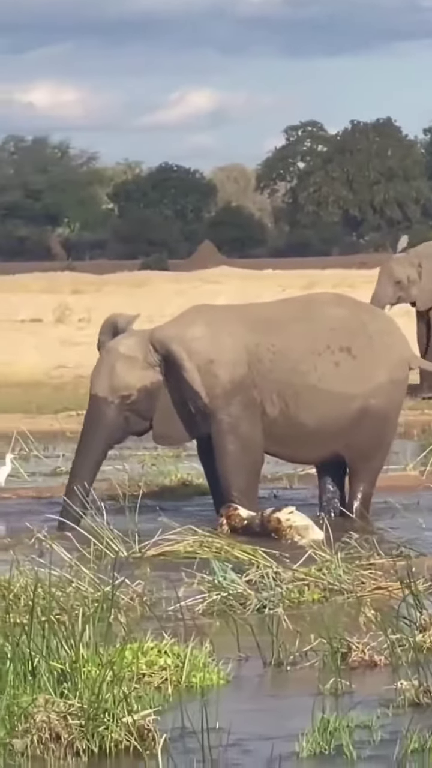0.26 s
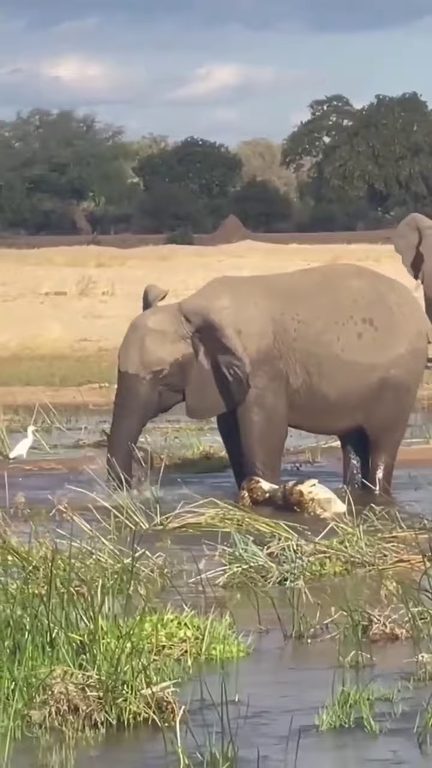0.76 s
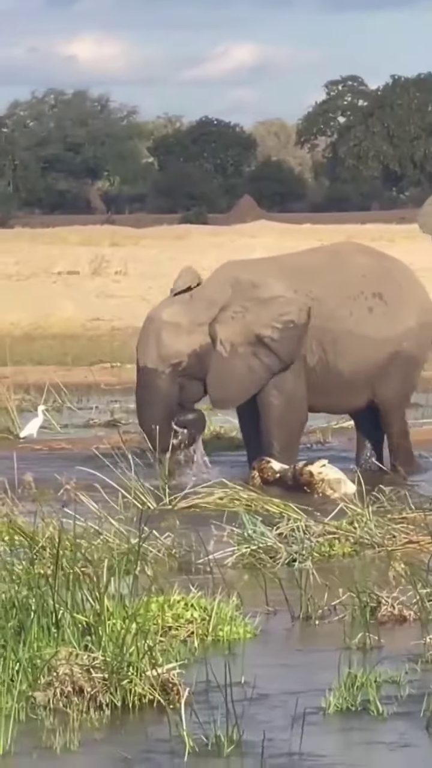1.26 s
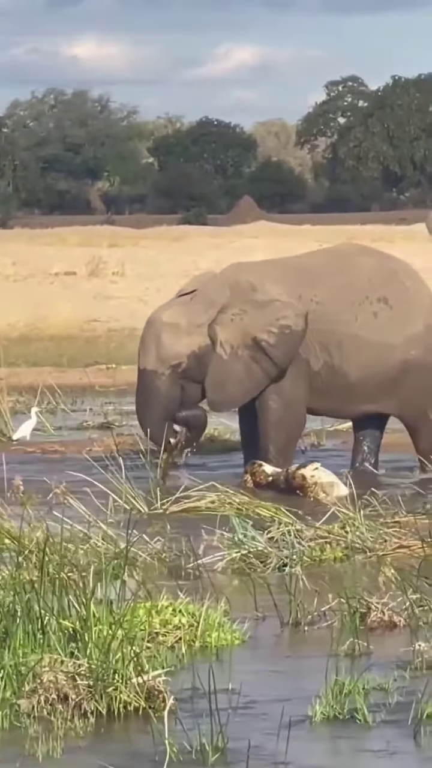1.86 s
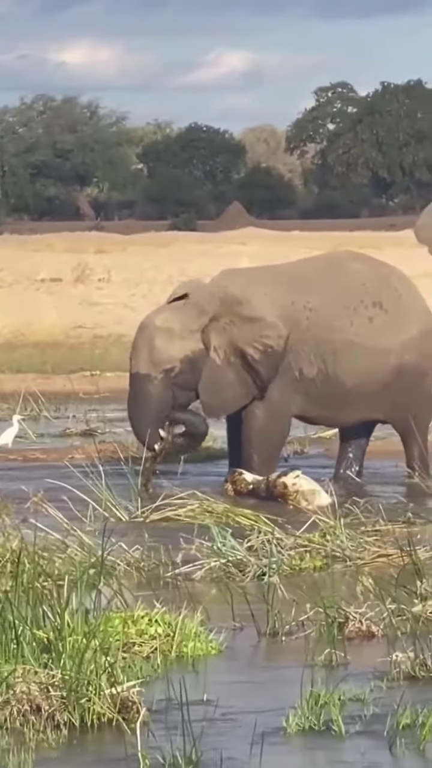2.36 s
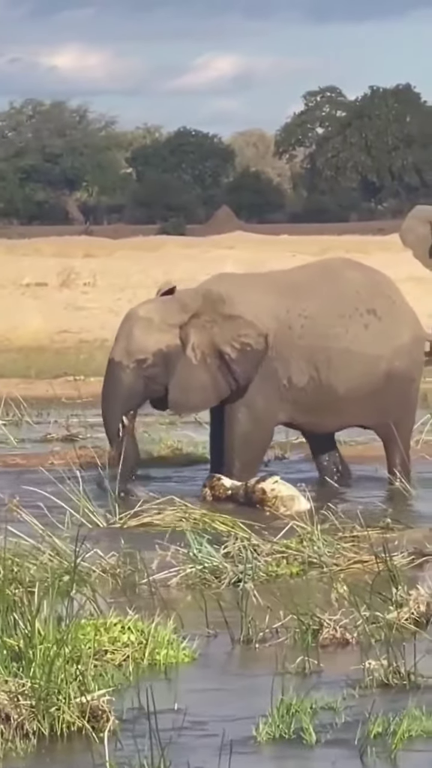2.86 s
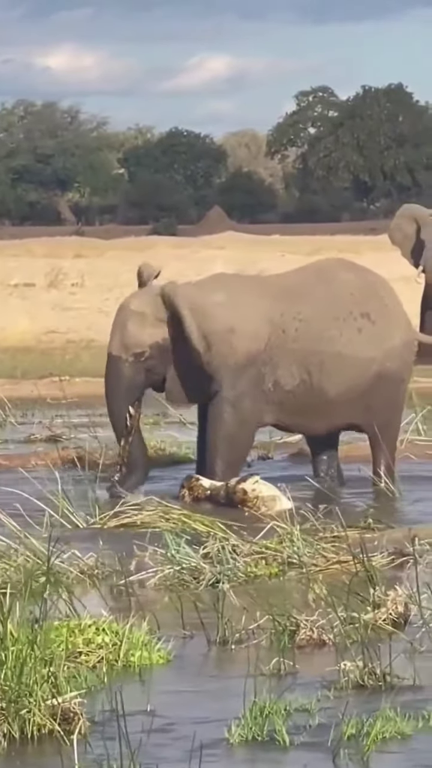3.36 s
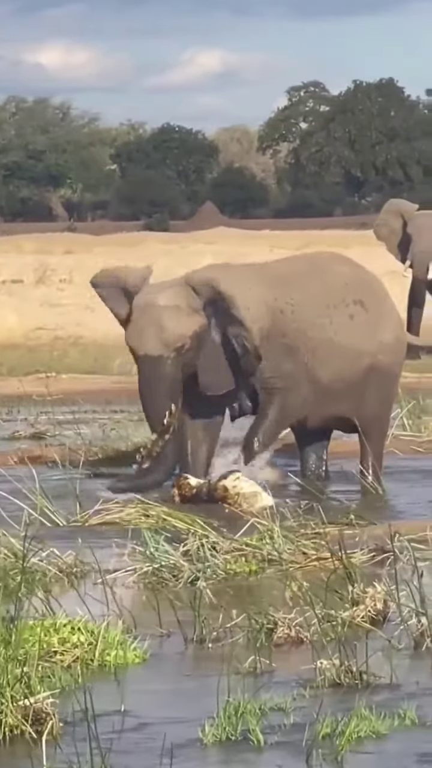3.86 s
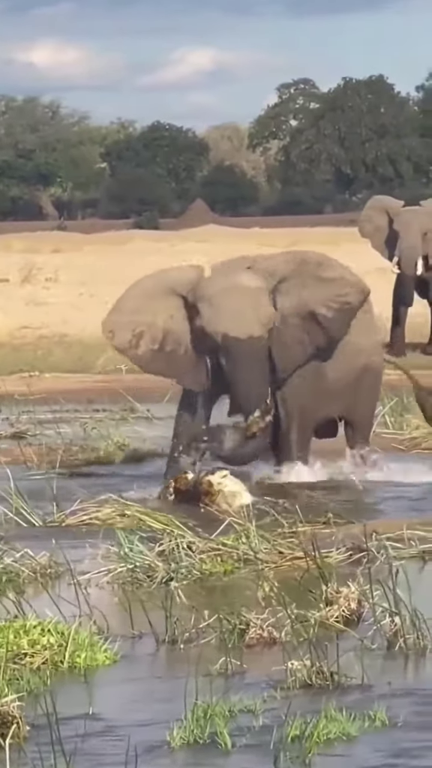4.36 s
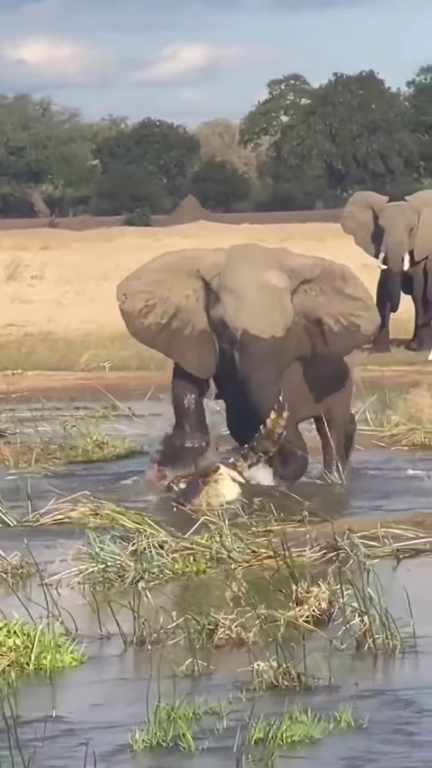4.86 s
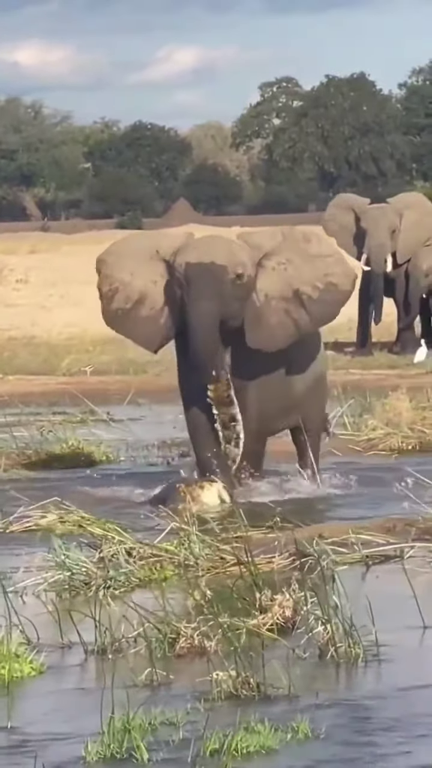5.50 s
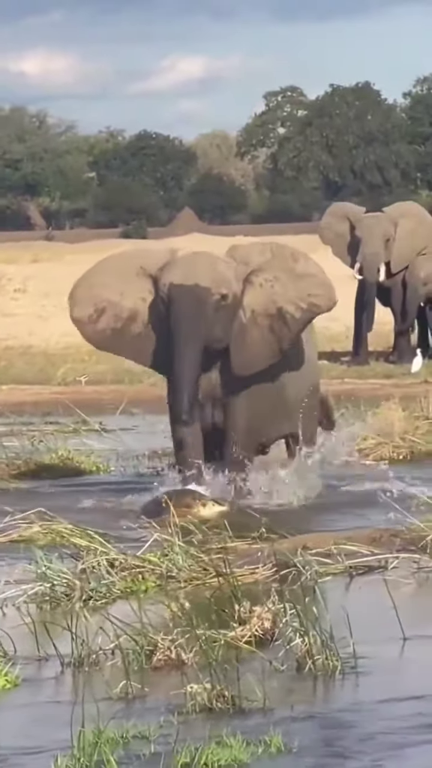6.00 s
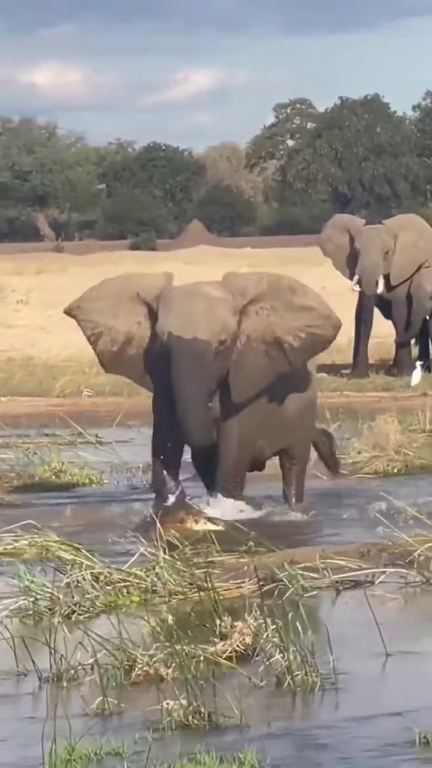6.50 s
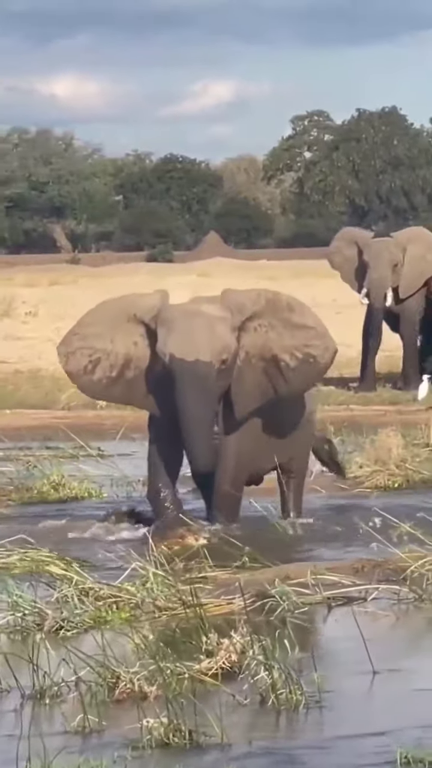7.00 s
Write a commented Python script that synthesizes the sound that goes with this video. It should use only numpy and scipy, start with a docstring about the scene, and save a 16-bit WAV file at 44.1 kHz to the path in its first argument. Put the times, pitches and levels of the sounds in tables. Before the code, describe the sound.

Outdoors at a shallow river, wind rumbles and puffs strongly on a handheld microphone over a low drone and faint river wash. Some way off, an elephant's trunk sloshes and gurgles softly, with small drops and ticks. A hard dull thump jolts the microphone just before four seconds, then the animal stamps and thrashes: bubbling plunges, wet slaps and spray raining back until the end.

```python
"""An elephant in a shallow river, some way off, over a steady low background and the faint wash of the river.
At first its trunk sloshes and gurgles: each splash is a dull slosh, a wash of bubbles and a spray that rains back.
Wind buffets the microphone in puffs and gusts and keeps up a hollow rumble that swells into clean notes.
A few drops, ticks and rustles stand out; one hard thump falls just before 4 s.
Then the animal stamps and thrashes: legs plunge in with clouds of bubbles, among harder slaps and splashes."""
import sys
import numpy as np
from scipy import signal
from scipy.io import wavfile

SR = 44100
rng = np.random.default_rng(int(sys.argv[2]) if len(sys.argv) > 2 else 0)


def persist_wave(psi):
    """Save psi, clipped to +-1, as 16-bit WAV."""
    counts = np.round(np.clip(psi, -1, 1) * 32767).astype(np.int16)
    wavfile.write(sys.argv[1], SR, np.atleast_2d(counts).T)


N = 319328
TIME = np.arange(N) / SR

# colour of the thrown water as it patters back: f/Hz, density/dB per Hz
SPRAY_SPECTRUM = [(1700, 7.5), (2200, 4.5), (3300, 6), (4200, 1), (5600, 2.5), (6500, -9.5), (8200, -11),
                  (10000, -41)]
# strength of the breeze, as the level of the hollow rumble it keeps up: t/s, level/dB
BREEZE_CURVE = [(0, -35.5), (.12, -35), (.4, -34.5), (.9, -33), (1.6, -30), (2.3, -24.5), (2.4, -34.5),
                (2.9, -29.5), (3.7, -28.5), (4.15, -40.5), (4.9, -42), (5.3, -30), (5.57, -34),
                (5.68, -26.5), (6.0, -33.5), (6.7, -35), (7.24, -36.5)]


def from_db(db):
    """Decibels to gain."""
    return 10 ** (np.asarray(db) / 20)


def rms_one(x):
    """Scale to unit rms."""
    return x / np.sqrt(np.mean(x ** 2) + 1e-20)


def in_time(rows):
    """Each column of a curve table, at every sample."""
    s, *columns = np.transpose(rows)
    return [np.interp(TIME, s, column) for column in columns]


def at_hz(points, hz):
    """Read a spectrum on a log-frequency axis."""
    point_hz, point_db = np.transpose(points)
    return np.interp(np.log(hz), np.log(point_hz), point_db)


def drift(rate):
    """Slow chance with about this many turns a second; spread 1."""
    step = 40  # samples between slow values
    r = np.exp(-2 * np.pi * rate * step / SR)
    white = rng.standard_normal(N // step + 2002)
    slow = signal.lfilter([1], [1, -2 * r, r * r], white)[2000:]  # let the filter settle first
    return np.interp(np.arange(N) / step, np.arange(len(slow)), rms_one(slow))


def resonate(x, hz, width_hz):
    """A resonance with gain 1 at its top."""
    r = np.exp(-np.pi * width_hz / SR)
    feedforward = np.array([1, 0, -1]) * (1 - r * r) / 2
    feedback = [1, -2 * r * np.cos(2 * np.pi * hz / SR), r * r]
    return signal.lfilter(feedforward, feedback, x + 1e-18)


def band(x, hz, width_hz):
    """A resonance passed twice: steep skirts."""
    return resonate(resonate(x, hz, width_hz), hz, width_hz)


def low_pass(x, hz):
    """Steep cut above hz."""
    return signal.sosfilt(signal.butter(8, hz, fs=SR, output="sos"), x)


def add(out, s, sound):
    """Mix a short sound in at time s."""
    start = max(0, round(s * SR))
    out[start:start + len(sound)] += sound[:max(0, N - start)]


def swell(s, length_s, attack_s, release_s):
    """Rise, hold until the length is over, then fall 60 dB in the release time."""
    t = TIME - s
    rise = np.clip(t / attack_s, 0, 1)
    return rise * np.exp(-np.log(1000) * np.clip((t - length_s) / release_s, 0, 2))


def swells_db(rows, rise_share, release_s, rest_db):
    """Level in dB of overlapping swells (s, length s, dB) added to a resting level; longer ones build more slowly."""
    power = from_db(rest_db) ** 2
    for s, length_s, db in rows:
        power = power + (from_db(db) * swell(s, length_s, rise_share * length_s, release_s)) ** 2
    return 10 * np.log10(power)


def turbulence(spectrum, patchy_db, patch_rate):
    """Third-octave bands of noise that flicker partly together, partly alone; rms 1."""
    edges = 2 ** np.arange(np.log2(spectrum[0][0]), np.log2(spectrum[-1][0]), 1 / 3)
    white, together, out = rng.standard_normal((2, N)), drift(patch_rate), 0
    for k, low in enumerate(edges):
        high = min(low * 2 ** (1 / 3), .45 * SR)
        # neighbouring bands draw on different noises
        noise = signal.sosfilt(signal.butter(2, [low, high], "band", fs=SR, output="sos"), white[k % 2])
        flicker_db = patchy_db * (together + drift(patch_rate)) / np.sqrt(2)
        out = out + noise * from_db(at_hz(spectrum, np.sqrt(low * high)) + flicker_db)
    return rms_one(out)


def bubbles(spectrum, per_s, cycles, spread_db, clump_db, count=16):
    """Bubbles of random size, each ringing for some cycles; those of one pitch come in clumps; rms 1."""
    sizes = from_db(spread_db * np.minimum(rng.exponential(1, N), 4)) * rng.choice([-1, 1], N)
    clicks = sizes * (rng.random(N) < per_s / SR)
    dealt, out = rng.integers(0, count, N), 0  # each click goes to one of count pitches
    for k, hz in enumerate(np.geomspace(spectrum[0][0], spectrum[-1][0], count)):
        clumped = clicks * (dealt == k) * from_db(clump_db * drift(33.0))
        ringing = rms_one(band(clumped, hz, 2 * hz / cycles))
        # sqrt(hz): pitches lie wider apart as they rise, and the spectrum is per Hz
        out = out + ringing * np.sqrt(hz) * from_db(at_hz(spectrum, hz))
    return rms_one(out)


def background():
    """A dull steady drone of low noise, and the faint wash of the river farther off."""
    # colours of the drone and the far river: f/Hz, density/dB per Hz
    drone_spectrum = [(25, -29.5), (55, -10), (105, 5), (170, -11.5), (300, -15), (390, -20.5), (490, -9.5),
                      (620, -33)]
    far_spectrum = [(700, -3), (950, 4.5), (1150, -11), (1500, 6.5), (1900, -3.5), (2300, -5.5),
                    (4000, -22.5), (5600, -4.5), (7000, -43), (12000, -46.5)]
    drone = low_pass(turbulence(drone_spectrum, patchy_db=1.5, patch_rate=13.0), hz=540)
    far_river = turbulence(far_spectrum, patchy_db=3.5, patch_rate=64)
    return from_db(-32.0) * drone + from_db(-54.5) * far_river


def water_levels():
    """Levels of wash, spray and mist: in each throw the wash builds a little faster, the spray and mist fade sooner."""
    # trunk and feet throw water, levels ahead of each layer's trim:
    # t/s, length/s, bubble wash level/dB, spray level/dB, fine mist level/dB
    throws = [(0.332, 0.68, -55, -62, -80.5), (0.591, 0.41, -48, -54, -74), (0.982, 0.45, -46.5, -54, -74),
              (1.218, 0.65, -49, -55, -67.5), (1.878, 0.23, -48, -57, -80), (3.186, 0.21, -48, -67, -101),
              (3.316, 0.36, -48.5, -59.5, -94), (3.61, 0.57, -45.5, -58, -86),
              (3.995, 0.19, -40.5, -56, -74), (4.175, 0.052, -44, -55.5, -71), (4.283, 0.42, -41, -48, -65),
              (4.629, 0.032, -40, -64, -71), (4.729, 0.37, -47, -55, -71.5), (4.878, 0.11, -41, -56.5, -75),
              (5.141, 0.19, -41, -54.5, -68), (5.288, 0.086, -38.5, -46, -61),
              (5.346, 0.44, -43.5, -48.5, -62.5), (5.797, 0.2, -40.5, -53, -68.5),
              (5.937, 0.069, -38, -48, -65), (6.077, 0.21, -43, -55, -72), (6.154, 0.6, -40.5, -48.5, -65),
              (6.849, 0.2, -44.5, -55, -72), (7.14, 0.064, -47, -63, -81)]
    s, length_s, wash_db, spray_db, mist_db = np.transpose(throws)
    # a splash builds for a share of its length, then dies away to quiet lapping
    wash_shape = dict(rise_share=0.22, release_s=0.99)
    spray_shape = dict(rise_share=0.29, release_s=0.83)
    return (swells_db(zip(s, length_s, wash_db), **wash_shape, rest_db=-50.5),
            swells_db(zip(s, length_s, spray_db), **spray_shape, rest_db=-63.5),
            swells_db(zip(s, length_s, mist_db), **spray_shape, rest_db=-81))


def splashing(wash_db, spray_db, mist_db, hard_db=-44, churn_growth=4.6):
    """Big pockets of air slosh, small bubbles wash, and thrown water patters back as spray and mist."""
    # colours of slosh, wash, churn and mist: f/Hz, density/dB per Hz
    slosh_spectrum = [(380, -16), (440, -13.5), (520, -4), (590, -4), (650, -11)]
    wash_spectrum = [(1100, -6.5), (1400, 4), (1600, 0), (1950, -24)]
    churn_spectrum = [(600, 9), (700, -1.5), (820, -3), (1000, -8.5), (1200, -1.5)]
    mist_spectrum = [(5000, -2), (5700, -3), (7500, 4.5), (9800, 6), (11200, 7.5), (11900, 3.5),
                     (12500, -15.5)]
    # the slosh has its own mean level and takes a share of the wash's swing
    slosh_db = -44.5 + 0.71 * (wash_db - wash_db.mean())
    pockets = bubbles(slosh_spectrum, per_s=600, cycles=22.3, spread_db=2.5, clump_db=4.5, count=24)
    slosh = from_db(slosh_db - 5.0) * pockets
    small = bubbles(wash_spectrum, per_s=900, cycles=43, spread_db=1.0, clump_db=1.0)
    wash = from_db(wash_db - 10.5) * small
    # only hard splashes drive enough air under to make the larger churning bubbles
    churn_db = wash_db + churn_growth * np.minimum(wash_db - hard_db, 0)
    larger = bubbles(churn_spectrum, per_s=690, cycles=19.7, spread_db=4.0, clump_db=3.0, count=14)
    churn = from_db(churn_db - 7.5) * larger
    patter = bubbles(SPRAY_SPECTRUM, per_s=2400, cycles=32, spread_db=1.6, clump_db=2.0, count=44)
    hiss = turbulence(SPRAY_SPECTRUM, patchy_db=1.5, patch_rate=7.5)
    spray = from_db(spray_db) * (from_db(-4.5) * patter + from_db(-2.0) * hiss)
    fine = bubbles(mist_spectrum, per_s=6900, cycles=65, spread_db=1.5, clump_db=2.5, count=56)
    mist = from_db(mist_db + 4.5) * fine
    return low_pass(slosh, hz=635) + churn + wash + spray + mist


def dollops(per_s=45, fade_s=.012, share=.18):
    """Thrown water lands in dollops: a share of the sound comes in sudden swells that fade; rms 1."""
    landings = (rng.random(N) < per_s / SR) * rng.uniform(.5, 1, N)
    power = signal.lfilter([1], [1, -np.exp(-1 / (fade_s * SR))], landings + 1e-18)
    return np.sqrt(1 - share + share * power / power.mean())


def plops(wash_db, level_db=-13, hard_db=-44):
    """Lone large bubbles stand out of the hard splashes with a clear, longer ring."""
    # colour of the plops: f/Hz, density/dB per Hz
    plop_spectrum = [(650, 2), (1300, 3.5), (1700, -14.5), (2300, -10.5), (3400, -18), (4300, -23)]
    lone = bubbles(plop_spectrum, per_s=260, cycles=30, spread_db=2.0, clump_db=1.5, count=36)
    return from_db(wash_db + level_db + .5 * np.minimum(wash_db - hard_db, 0)) * lone


def spatter(spray_db, level_db=-12, hard_db=-48, growth=0.3):
    """Heavy drops of a hard splash crack on the water one by one, each a short ring."""
    cracks = bubbles(SPRAY_SPECTRUM[:-2], per_s=160, cycles=12.0, spread_db=1.2, clump_db=0.0, count=12)
    return from_db(spray_db + level_db + growth * np.minimum(spray_db - hard_db, 0)) * cracks


def gurgles(churn_rate=90, level_db=-0.5, wander=.06, firm=.4):
    """A falling stream keeps a pocket of air ringing unevenly; its pitch moves as its size changes."""
    # water runs off the trunk and churns pockets of air: t/s, length/s, level/dB ahead of the trim, f/Hz
    streams = [(0, 0.082, -42.5, 486.4), (0.547, 0.036, -39.5, 480), (0.89, 0.2, -51.5, 880),
               (1.266, 0.52, -41, 488), (1.325, 0.055, -46, 713), (1.414, 0.21, -50, 904),
               (1.594, 0.16, -40.5, 540), (1.804, 0.22, -39.5, 497), (1.766, 0.081, -49.5, 859),
               (3.285, 0.45, -51, 639), (3.349, 0.14, -42, 520)]
    out = 0
    for s, length_s, db, hz in streams:
        phase = 2 * np.pi * np.cumsum(hz * (1 + wander * drift(6))) / SR
        steady_part = (firm + drift(churn_rate)) * np.sin(phase)
        pocket = rms_one(steady_part + drift(churn_rate) * np.cos(phase))
        envelope = swell(s, length_s, attack_s=0.0087, release_s=0.15)
        out = out + from_db(db + level_db) * envelope * pocket
    return out


def rumble(wander=0.0539, flutter_db=3.0, width_hz=60, breathy_db=-7, surge_db=1, early_release_s=0.03005):
    """Wind sets a hollow ringing: a low tone that wavers in rough air and holds clean in a surge."""
    # the rumble catches and swells into a clean note:
    # t/s, length/s ahead of the early release, level/dB ahead of the surge trim, f/Hz
    clean_notes = [(1.232, 0.077, -24, 106), (1.416, 0.047, -15, 113), (1.539, 0.098, -19.5, 115),
                   (1.633, 0.077, -23.5, 106), (1.775, 0.064, -17.5, 105.6), (1.849, 0.059, -16, 100.4),
                   (1.935, 0.075, -17, 103.5), (2.012, 0.05, -12, 110.6), (2.077, 0.047, -14, 96.4),
                   (2.168, 0.059, -13, 105), (2.295, 0.048, -9, 104.2), (2.451, 0.089, -17.5, 113.2),
                   (2.58, 0.088, -19.5, 104.5), (2.781, 0.09, -21.5, 101), (2.864, 0.066, -19.5, 100.7),
                   (2.991, 0.057, -20, 101.7), (3.083, 0.058, -22, 96.6), (3.323, 0.077, -26, 95.7),
                   (3.404, 0.12, -21.5, 127.4), (3.565, 0.07, -20.5, 109.5), (3.731, 0.042, -25.5, 108.4),
                   (3.803, 0.027, -24, 104.3), (4.739, 0.12, -23, 102.6), (4.821, 0.17, -20.5, 100.8),
                   (4.977, 0.14, -23, 102.1), (5.085, 0.13, -19.5, 102.4), (5.261, 0.053, -20, 113.7),
                   (5.498, 0.045, -12.5, 106.4), (5.609, 0.09, -23, 118)]
    rest_hz, attack_s, release_s = 108.04, 0.022, 0.068
    breeze_db, = in_time(BREEZE_CURVE)
    rough = from_db(breeze_db) ** 2
    power, pull = rough, rough * rest_hz
    for s, length_s, db, note_hz in clean_notes:
        envelope = swell(s, length_s - early_release_s, attack_s, release_s)
        surge = (from_db(db + surge_db) * envelope) ** 2
        power, pull = power + surge, pull + surge * note_hz
    # the stronger of breeze and surge rules the pitch
    hz, unsteady = pull / power, rough / power
    phase = 2 * np.pi * np.cumsum(hz * (1 + wander * unsteady * drift(14.3))) / SR
    tone = np.sqrt(2) * np.sin(phase) * from_db(flutter_db * unsteady * drift(41))
    air = unsteady * from_db(breathy_db) * rms_one(band(rng.standard_normal(N), 142.7, width_hz))
    return np.sqrt(power) * (tone + air)


def wind():
    """Large eddies sway the diaphragm, small ones buffet it in lumps; a gust may raise either or both."""
    # gusts on the microphone, levels ahead of the trims: t/s, length/s, buffeting level/dB, deep sway level/dB
    gusts = [(0.49, 0.28, -23.5, -34), (0.844, 0.084, -30, -29), (1.441, 0.046, -22.5, -42),
             (1.85, 0.25, -39, -28.5), (2.64, 0.052, -40.5, -24.5), (3.054, 0.072, -28.5, -22.5),
             (3.246, 0.17, -26, -46), (3.361, 0.37, -30.5, -30), (3.534, 0.053, -28, -27),
             (3.796, 0.11, -20.5, -29), (3.989, 0.028, -21.5, -18.5), (4.199, 0.087, -29, -26),
             (4.454, 0.059, -29.5, -45), (4.895, 0.19, -51, -31), (5.131, 0.071, -26.5, -19),
             (5.285, 0.049, -21, -39), (5.558, 0.076, -26, -45), (5.833, 0.44, -26, -34),
             (6.385, 0.17, -27, -28.5), (6.886, 0.32, -25, -39)]
    # colours of the sway and the buffeting: f/Hz, density/dB per Hz
    sway_spectrum = [(22, -27.5), (35, -4.5), (58, -6), (75, 2), (110, -12)]
    buffet_spectrum = [(110, 5), (145, 4), (230, 0), (310, -5.5), (400, -23), (550, -33), (750, -37.5)]
    shape = dict(rise_share=0.19, release_s=0.26)
    # between the gusts, buffeting takes a share of the breeze's swing and the sway rests
    breeze_db, = in_time(BREEZE_CURVE)
    mean_db = breeze_db.mean()
    calm_db = mean_db + 0.55 * (breeze_db - mean_db) - 0.5
    buffet_db = swells_db([(s, length, db) for s, length, db, _ in gusts], **shape, rest_db=calm_db)
    sway_db = swells_db([(s, length, db) for s, length, _, db in gusts], **shape, rest_db=-36.5)
    sway = from_db(sway_db - 4.5) * turbulence(sway_spectrum, patchy_db=0.5, patch_rate=18)
    buffet = from_db(buffet_db - 4.5) * turbulence(buffet_spectrum, patchy_db=3.0, patch_rate=20.5)
    return low_pass(sway + buffet, hz=589)


def rustles():
    """Dry stems slide over each other in short, scratchy strokes of thin noise."""
    # stems brush past close by: t/s, length/s, level/dB
    brushes = [(-0.002, 0.03, -64), (0.18, 0.04, -65), (0.503, 0.045, -71), (2.487, 0.056, -67),
               (3.711, 0.057, -71.5), (3.895, 0.044, -73), (4.082, 0.031, -59.5), (4.19, 0.033, -59.5),
               (7.023, 0.037, -72)]
    # colour of the stems: f/Hz, density/dB per Hz
    stem_spectrum = [(7000, -13), (9500, -1), (10800, -3), (11600, -6), (12500, -18)]
    strokes = sum(from_db(db) * swell(s, length_s, attack_s=.01, release_s=.16) for s, length_s, db in brushes)
    return strokes * turbulence(stem_spectrum, patchy_db=4.0, patch_rate=120)


def slaps(level_db=-3, smack_db=2, smack_cycles=2.5, burst_db=-2):
    """A flat blow on the water: a short smack on contact, then a broad burst that dies quickly."""
    # slaps of feet and trunk on the water: t/s, level/dB ahead of the trims, f/Hz, ring (60 dB fall)/s
    blows = [(0.287, -46, 1300, 0.1), (1.159, -36, 1730, 0.032), (1.891, -35.5, 1410, 0.042),
             (2.325, -45, 1910, 0.021), (2.588, -39, 1530, 0.032), (3.269, -41, 520, 0.045),
             (3.3, -39, 1140, 0.026), (3.326, -44, 3030, 0.038), (3.371, -40, 1900, 0.044),
             (3.444, -39, 1012, 0.025), (4.029, -40.5, 2000, 0.042), (4.183, -46, 1184, 0.09),
             (4.217, -39.5, 2100, .06), (4.358, -30.5, 1010, 0.034), (4.571, -41, 1587, 0.051),
             (4.646, -40, 2290, 0.16), (4.899, -40, 1300, 0.038), (4.941, -37, 650.5, 0.04),
             (5.313, -40, 1110, 0.045), (5.332, -36, 1216, .05), (5.349, -24.5, 1080, 0.046),
             (5.35, -29, 3220, 0.037), (5.381, -31.5, 1198, 0.045), (5.438, -33, 1398, 0.042),
             (5.651, -34, 1070, 0.12), (5.714, -35, 1264, 0.087), (5.747, -34, 1240, 0.036),
             (5.778, -33.5, 1300, 0.04), (5.835, -31, 600, 0.032), (5.948, -42, 2130, 0.059),
             (5.979, -36, 1408, 0.099), (6.136, -58, 1090, 0.13), (6.288, -34, 1110, 0.084),
             (6.549, -36, 1110, 0.08), (6.674, -43, 2010, 0.08), (6.727, -40, 1225, 0.039)]
    out, t = np.zeros(N), TIME[:SR // 5]
    for s, peak_db, hz, ring_s in blows:
        smack = np.sin(2 * np.pi * hz * t) * from_db(smack_db) * np.exp(-hz * t / smack_cycles)
        noise = rms_one(band(rng.standard_normal(len(t)), hz, .8 * hz))
        burst = noise * from_db(burst_db - 60 * t / ring_s)
        add(out, s, from_db(peak_db + level_db) * (smack + burst))
    return out


def puffs(rise_s=0.0043, level_db=-3, ragged_db=-10):
    """An eddy strikes the port: a short low whump with a ragged body."""
    # single puffs of wind: t/s, level/dB ahead of the trim, f/Hz
    eddies = [(0.616, -16.5, 240), (0.737, -16, 221), (0.884, -23, 326), (1.156, -18.5, 276),
              (1.309, -22.5, 272), (1.478, -18, 260), (1.497, -17.5, 254), (1.959, -23, 255),
              (2.183, -28, 238), (2.324, -16, 237), (2.456, -24, 330), (3.093, -19, 229),
              (3.128, -29, 241.5), (3.326, -21.5, 238), (3.905, -23, 256), (4.011, -41, 189),
              (4.505, -19.5, 253.4), (5.319, -17, 239.6), (5.919, -17.5, 213), (6.069, -20, 240),
              (6.114, -16.5, 246), (6.158, -23, 194.5), (6.241, -16.5, 198), (6.414, -18, 228),
              (7.123, -15.5, 264.4), (7.174, -17, 326)]
    out, t = np.zeros(N), TIME[:SR // 10]
    envelope = t / rise_s * np.exp(1 - t / rise_s)
    for s, peak_db, hz in eddies:
        whump = np.sin(2 * np.pi * hz * t)
        ragged = rms_one(band(rng.standard_normal(len(t)), hz, hz))
        add(out, s, from_db(peak_db + level_db) * envelope * (whump + from_db(ragged_db) * ragged))
    return low_pass(out, hz=520)


def drops(rise=0.44, splat_db=-12, level_db=-2):
    """A drop splats and leaves a bubble whose pitch climbs as it dies."""
    # single drops and large bubbles: t/s, level/dB ahead of the trim, starting f/Hz, ring (60 dB fall)/s
    lone_drops = [(0.905, -39, 1650, 0.022), (1.1, -52, 3000, .048), (1.404, -26.5, 714, 0.046),
                  (1.456, -35, 855, .05), (1.691, -46, 3330, .048), (1.783, -47, 720, 0.047),
                  (2.085, -39.5, 1060, 0.052), (2.188, -35, 566, 0.072), (2.973, -42, 3360, 0.024),
                  (3.068, -50, 3270, 0.036), (3.205, -38, 2450, 0.039), (3.371, -23, 565, 0.053),
                  (3.444, -30, 587, .06), (3.741, -40.5, 3370, 0.022), (3.851, -41, 1523, 0.071),
                  (4.594, -29, 955, 0.035), (4.695, -36, 1120, 0.035), (6.14, -29.5, 934, 0.059),
                  (6.297, -22.5, 602, 0.043), (6.564, -32, 910, 0.041), (6.758, -39, 652, .05),
                  (6.801, -34, 854, 0.04), (6.949, -37, 1135, 0.046), (6.975, -28, 590, 0.068),
                  (7.02, -36, 810, .05), (7.1, -40, 1400, 0.037)]
    out, t = np.zeros(N), TIME[:SR // 10]
    for s, peak_db, hz, ring_s in lone_drops:
        bubble = np.sin(2 * np.pi * hz * t * (1 + rise * t))
        splat = from_db(splat_db) * rms_one(band(rng.standard_normal(len(t)), hz, hz / 2))
        opening = 1 - np.exp(-hz * t)
        add(out, s, opening * from_db(peak_db + level_db - 60 * t / ring_s) * (bubble + splat))
    return out


def ticks(level_db=-3, snap_hz=5900, snap_width_hz=6000, rise_s=0.00044):
    """Brief bright ticks near the microphone: a dry noise snap mixed with a clear ring."""
    # small sharp ticks: t/s, level/dB ahead of the trim, ring (60 dB fall)/s, share of clear ring/0-1
    close_ticks = [(2.326, -40, 0.016, 0.5), (2.785, -50, 0.036, 0.34), (2.991, -42, 0.054, 0.46),
                   (2.998, -45, 0.025, 0.4), (3.008, -48, 0.045, 0.35), (3.999, -46, 0.033, 0.52),
                   (5.3, -37, 0.024, 0.29), (5.352, -46, 0.018, 0.23), (5.6422, -14, 0.006, 0.9),
                   (6.005, -43, 0.032, 0.18)]
    # what a tick rings with: f/Hz, relative level/dB
    ring_modes = [(5300, 7), (5600, 13), (5950, -13.5), (7300, -15), (9900, -18), (11000, -1.5),
                  (12300, -5)]
    out, t = np.zeros(N), TIME[:SR // 10]
    ring = rms_one(sum(from_db(db) * np.sin(2 * np.pi * hz * t) for hz, db in ring_modes))
    for s, peak_db, ring_s, clear in close_ticks:
        snap = rms_one(band(rng.standard_normal(len(t)), snap_hz, snap_width_hz))
        envelope = (1 - np.exp(-t / rise_s)) * from_db(peak_db + level_db - 60 * t / ring_s)
        add(out, s, envelope * (clear * ring + (1 - clear) * snap))
    return out


def thump(dull_hz=1050, rise_s=0.00022, level_db=1.5):
    """Heavily damped shoves in quick succession, each setting the housing ringing briefly."""
    # a quick run of shoves on the microphone: t/s, level/dB ahead of the trim, f/Hz, ring (60 dB fall)/s
    shoves = [(3.8015, -13.5, 430, .03), (3.8025, -18, 130, .03), (3.8092, -18, 700, .016),
              (3.8118, -6, 310, .018), (3.817, -2, 490, .012), (3.8194, -1, 200, .013),
              (3.8243, -21, 380, .035), (3.8345, -9.5, 72, .04), (3.8432, -21, 480, .016)]
    # what the housing rings with at each shove: f/Hz, level against the shove/dB, ring (60 dB fall)/s
    housing_modes = [(330, -24, .04), (565, -24, .039), (1500, -32, .012)]
    out, knock, t = np.zeros(N), np.zeros(N), TIME[:SR // 10]
    housing = 0
    for hz, db, ring_s in housing_modes:
        housing = housing + from_db(db - 60 * t / ring_s) * np.sin(2 * np.pi * hz * t)
    for s, peak_db, hz, ring_s in shoves:
        push = (1 - np.exp(-t / rise_s)) * from_db(peak_db + level_db)
        add(out, s, push * from_db(-60 * t / ring_s) * np.sin(2 * np.pi * hz * t))
        add(knock, s, push * housing)
    dulled = signal.sosfilt(signal.butter(3, dull_hz, fs=SR, output="sos"), out)
    return dulled + low_pass(knock, hz=1800)


def plunges(spread_octaves=0.393, cycles=22, rise=0.17, count=450, per_s=900, attack_s=.008, release_s=0.27):
    """A dense cloud of bubbles around a middle pitch, each climbing in pitch as it dies."""
    # a leg plunges in and drags a cloud of air under: t/s, length/s, level/dB, middle f/Hz
    legs = [(4.019, 0.081, -43.5, 616), (4.175, 0.033, -43, 1090), (4.356, 0.093, -41, 577.6),
            (4.467, 0.13, -42.5, 612), (4.64, 0.025, -42, 953), (4.944, 0.079, -44.5, 652.7),
            (5.319, 0.063, -43, 1108), (5.831, 0.036, -55, 558), (5.953, 0.14, -47, 639),
            (6.098, 0.17, -48.5, 558), (6.439, 0.15, -55, 630), (6.679, 0.099, -49.5, 1097)]
    out, t = 0, TIME[:SR // 16]
    for s, length_s, db, middle_hz in legs:
        cloud = np.zeros(N)
        lates, sizes = rng.random(count), rng.uniform(-0.9, 1, count)
        octaves = spread_octaves * np.clip(rng.standard_normal(count), -2, 2)
        for k in range(count):
            turns = middle_hz * 2 ** octaves[k] * t
            envelope = (1 - np.exp(-turns)) * np.exp(-np.log(1000) * turns / cycles)
            bubble = envelope * np.sin(2 * np.pi * turns * (1 + rise * turns / cycles / 2))
            add(cloud, s - attack_s + (k + lates[k]) / per_s, sizes[k] * bubble)
        # rms 1 over the stretch that the bubbles fill
        cloud = rms_one(cloud) * np.sqrt(count / per_s * SR / N)
        out = out + from_db(db) * swell(s, length_s, attack_s, release_s) * cloud
    return out


def scene():
    """River and wind over the steady background."""
    wash_db, spray_db, mist_db = water_levels()
    splashes = dollops() * splashing(wash_db, spray_db, mist_db) + plops(wash_db) + spatter(spray_db)
    river = splashes + gurgles() + slaps() + drops() + plunges()
    air = rumble() + wind() + puffs() + thump()
    return (background() + river + air + rustles() + ticks())[None]


def record(dry):
    """The deepest bass is rolled off, the housing cuts two narrow dips into the treble, and the top is cut off."""
    # narrow dips of the microphone housing: f/Hz, width/Hz
    dips = [(4870, 1080), (8900, 1800)]
    dry = signal.sosfilt(signal.butter(4, 34, "high", fs=SR, output="sos"), dry)
    for hz, width_hz in dips:
        dry = signal.lfilter(*signal.iirnotch(hz, hz / width_hz, fs=SR), dry)
    cutoff_hz = 13361
    return signal.sosfilt(signal.ellip(10, .3, 80, cutoff_hz, fs=SR, output="sos"), dry)


dry = scene()
out = record(dry)
persist_wave(out)
```